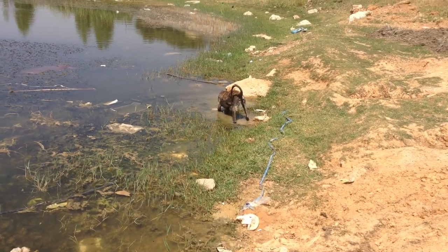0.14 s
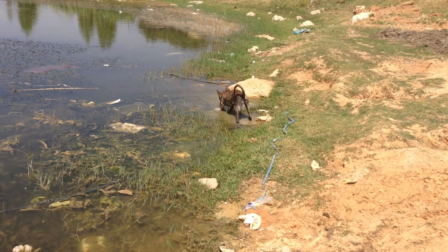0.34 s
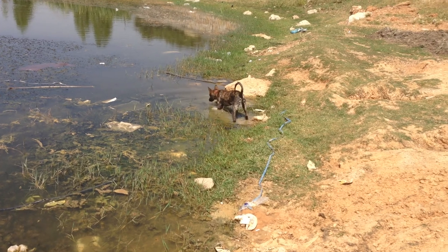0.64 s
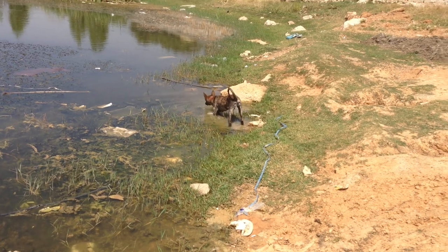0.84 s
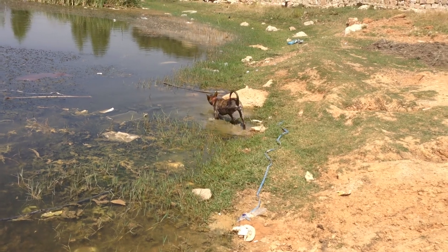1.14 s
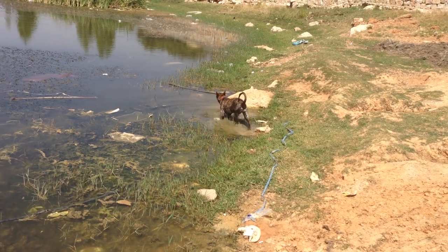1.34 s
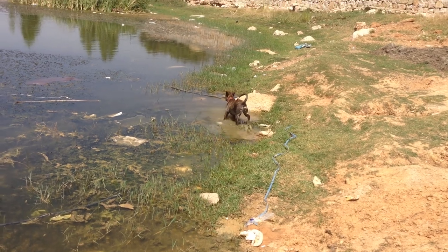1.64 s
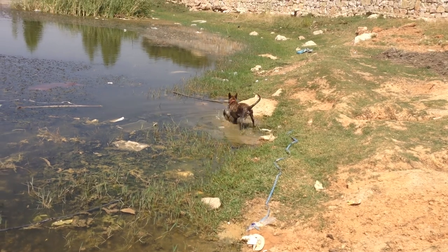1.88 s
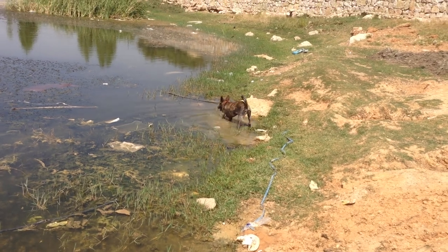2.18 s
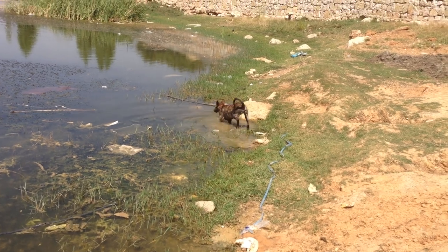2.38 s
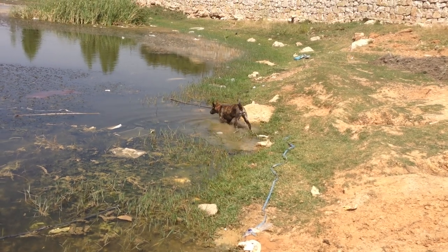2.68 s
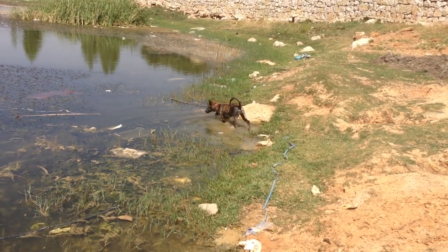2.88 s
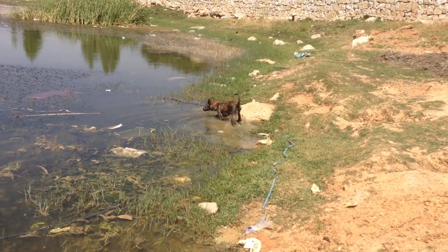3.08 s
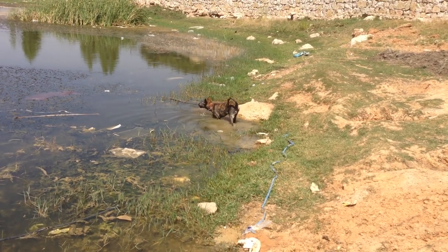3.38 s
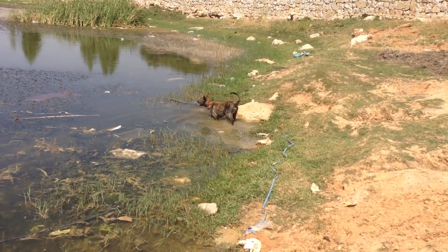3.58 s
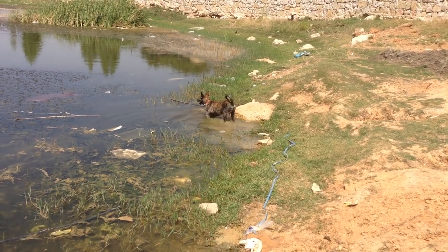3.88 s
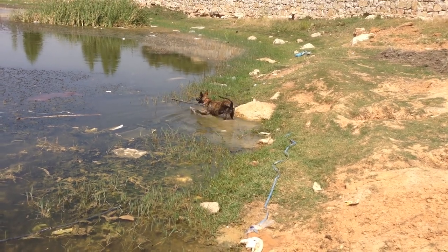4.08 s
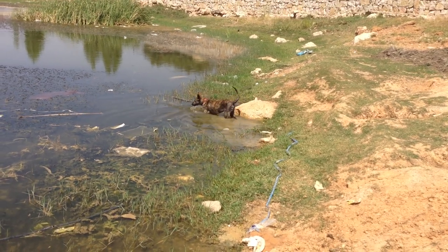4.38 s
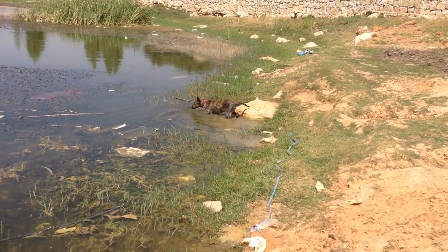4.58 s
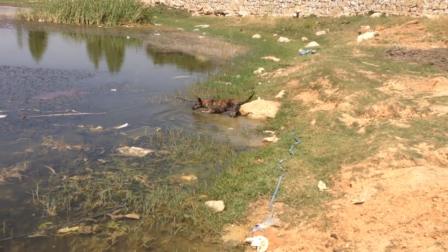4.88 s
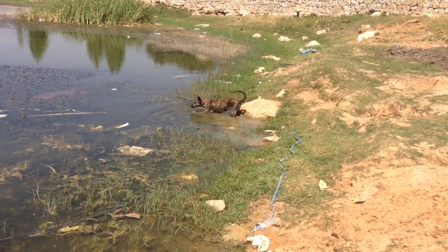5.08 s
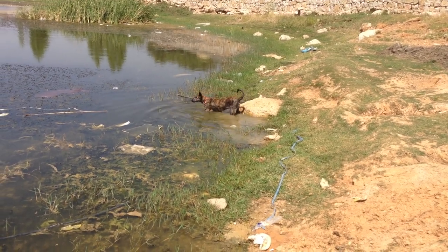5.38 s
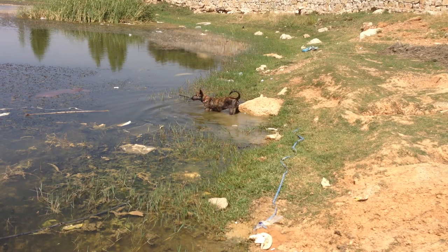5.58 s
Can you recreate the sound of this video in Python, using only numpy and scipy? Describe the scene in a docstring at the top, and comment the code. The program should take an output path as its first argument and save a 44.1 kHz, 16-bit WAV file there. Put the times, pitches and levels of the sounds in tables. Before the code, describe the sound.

A dog sloshes faintly through shallow pond water, with one sharp, loud snap near the microphone and a small bird chirping.

```python
"""A dog wades in the shallows of a pond some metres away: paws slap, plunge and spit spray, trapped air
rings as bubbles, and the legs push up sloshes and gurgles. A small bird repeats a twisting chirp.
Light wind bumps the microphone and two thin rustles pass over a quiet outdoor hush.
Right at the microphone something hard snaps once, bright and loud, like a handled casing."""
import sys
import numpy as np
from scipy import signal
from scipy.fft import rfft, irfft
from scipy.io import wavfile
from scipy.ndimage import uniform_filter1d

SR = 44100
rng = np.random.default_rng(int(sys.argv[2]) if len(sys.argv) > 2 else 0)


def log_audio(samples):
    """Write samples as a 16-bit WAV file to the path given in sys.argv[1]."""
    # one column per channel
    frames = np.atleast_2d(samples).T
    # limit to full scale, then quantise
    limited = np.clip(frames, -1, 1)
    pcm = np.round(limited * 32767).astype(np.int16)
    wavfile.write(sys.argv[1], SR, pcm)


N = 252693
TIME = np.arange(N) / SR

# Paws striking the water; closing_db is the water falling back, relative to the strike.
# start_s, slap_db, centre_hz, t60_s, closing_db, spray_db
PAW_FALLS = [(0.707, -50, 1684, 0.042, -12, -40), (0.863, -47, 1080, 0.024, -9, -49),
             (1.052, -53, 1130, 0.027, -19, -46), (1.31, -46.5, 2180, 0.012, -14, -53),
             (1.342, -40.5, 1470, 0.011, -10, -44.5), (1.461, -49, 1260, 0.02, 2.5, -56.5),
             (1.688, -51, 2230, 0.036, -5, -65), (1.828, -47, 1700, 0.0096, -11, -52),
             (2.048, -46.5, 3300, 0.019, 2.5, -51), (2.224, -42.5, 2280, 0.018, -11, -46),
             (2.446, -46, 1340, 0.015, -20, -70), (2.508, -51, 1020, 0.012, -20, -70),
             (2.6035, -39.5, 1870, 0.0072, -19.5, -56), (2.703, -39.5, 1005, 0.048, -19, -54.5),
             (3.014, -44, 3320, 0.029, -4.5, -50.5), (3.166, -47, 1650, 0.014, 1, -52),
             (3.296, -44.5, 2800, 0.032, -11, -56.5), (3.98, -55, 1730, 0.022, -18, -72),
             (4.156, -44, 1510, 0.0094, 6.5, -57.5), (4.341, -43, 1060, 0.014, -26, -54),
             (4.65, -49, 1480, 0.021, -20, -74), (4.695, -45, 1340, 0.035, -21, -74)]
CLOSING_S = 0.016  # the water falls back this long after a paw


def undb(db):
    """Decibels to gain."""
    return 10 ** (np.asarray(db) / 20)


def unit(x):
    """Scale to rms 1."""
    return x / np.sqrt(np.mean(x ** 2))


def add(out, start_s, sound):
    """Mix a sound in at its start time."""
    start = int(np.clip(start_s * SR, 0, N - 1))
    out[start:start + len(sound)] += sound[:N - start]


def colour(x, points, size=4096):
    """Minimum-phase EQ through (Hz, dB) points, so nothing rings ahead of an attack."""
    hz, db = np.transpose(points)
    bin_hz = np.fft.rfftfreq(size, 1 / SR) + 1
    log_gain = np.log(undb(np.interp(np.log(bin_hz), np.log(hz), db)))
    cepstrum = irfft(log_gain)[:size // 2]
    cepstrum[1:] *= 2
    impulse = irfft(np.exp(rfft(cepstrum, size)))
    return signal.fftconvolve(x, impulse)[:len(x)]


def band(x, low_hz, high_hz, order=2):
    """Band-pass."""
    sos = signal.butter(order, [low_hz, min(high_hz, SR / 2 - 1)], "band", fs=SR, output="sos")
    return signal.sosfilt(sos, x)


def walk(per_s):
    """A random modulator gliding between values with a spread of 1."""
    knots = np.arange(0, TIME[-1] + 1, 1 / per_s)
    return np.interp(TIME, knots, rng.standard_normal(N)[:len(knots)])


def fade(t60, size):
    """Exponential decay, 60 dB down after t60 seconds."""
    return np.exp(-np.log(1000) * TIME[:size] / max(t60, 1 / SR))


def swell(start_s, length_s, attack_s, release_s):
    """An envelope that rises, holds to the end of its length, then dies away."""
    t = TIME - start_s
    return np.clip(t / attack_s, 0, 1) * np.exp(-np.clip((t - length_s) / release_s, 0, 20))


def hush(level_db=-69.5):
    """A quiet, barely wavering bed of open air and microphone hiss."""
    # Tone of the bed: frequency_hz, gain_db
    spectrum = [(30, -46), (59, -24.5), (90, -13), (130, -3.5), (243, 1), (420, -3), (1150, -5.5),
                (1870, -8.5), (3400, -9.5), (6890, -13), (14300, -11.5), (15500, -11.5)]
    return undb(level_db + 0.29 * walk(11)) * unit(colour(rng.standard_normal(N), spectrum))


def wind(flutter_db=3, crackle_db=-15):
    """Small eddies bump briefly and unevenly against the microphone, with a faint crackle."""
    # Puffs of wind: start_s, length_s, level_db, centre_hz
    puffs = [(0.04, 0.53, -75.5, 122), (0.199, 0.023, -64.5, 200), (0.243, 0.0085, -57.5, 206),
             (0.358, 0.0063, -63, 172), (0.38, 0.0051, -57, 167), (4.949, 0.009, -58, 183),
             (4.974, 0.072, -64, 150), (5.041, 0.083, -59, 155), (5.122, 0.72, -79, 130.7),
             (5.265, 0.065, -71, 122.7), (5.459, 0.032, -68, 151), (5.511, 0.02, -61, 160)]
    eddies = rng.standard_normal(N) * undb(flutter_db * walk(120))
    crackle = unit(band(rng.standard_normal(N) * undb(6 * walk(200)), 200, 420))
    out = np.zeros(N)
    for start_s, length_s, db, hz in puffs:
        shape = swell(start_s, length_s, attack_s=0.0018, release_s=0.00722)
        rumble = unit(band(eddies, hz * 0.75, hz * 1.2))
        puff = shape * (rumble + undb(crackle_db) * crackle)
        out += undb(db) * puff * np.linalg.norm(shape) / np.linalg.norm(puff)
    return band(out, 75, 900)


def bird(upper_ratio=1.13, upper_db=-3, warble_hz=290):
    """A raspy, warbling chirp that swoops twice; the two sides of the syrinx sing slightly apart."""
    # Contour of one chirp: offset_s, pitch_hz, gain_db
    chirp = [(0, 3200, -14), (.010, 4000, -2), (.019, 4300, -1), (.033, 3500, 0), (.046, 2950, -6),
             (.059, 3150, 1), (.070, 3750, 0), (.084, 3000, 1), (.104, 2800, -2), (.122, 2500, -16)]
    # The bird's calls: start_s, level_db
    calls = [(0.218, -67), (2.78, -69.5), (3.833, -66), (4.696, -67.5)]
    out = np.zeros(N)
    offset_s, hz, db = np.transpose(chirp)
    t = TIME[:int(offset_s[-1] * SR)]
    for start_s, call_db in calls:
        for ratio, voice_db in ((1, 0), (upper_ratio, upper_db)):
            waver = .03 * walk(900)[:len(t)] + .025 * np.sin(2 * np.pi * warble_hz * t)
            pitch_hz = ratio * np.interp(t, offset_s, hz) * (1 + waver)
            rasp_db = 4.5 * walk(260)[:len(t)]
            level_db = call_db + voice_db + np.interp(t, offset_s, db) + rasp_db
            add(out, start_s, undb(level_db) * np.sin(2 * np.pi * np.cumsum(pitch_hz) / SR))
    return out


def rustle(attack_s=0.022, release_s=0.0074):
    """Thin, bright, uneven rustles pass."""
    # Swells of high hiss: start_s, length_s, level_db
    rustles = [(0.284, 0.025, -59.5), (1.08, 0.3, -75)]
    flutter_db = 3 * walk(45) + 3 * walk(400)
    envelope = sum(undb(db) * swell(start_s, length_s, attack_s, release_s)
                   for start_s, length_s, db in rustles)
    return envelope * undb(flutter_db) * unit(band(rng.standard_normal(N), 10400, 14400))


def bubble(hz, t60, octaves_per_s):
    """Trapped air rings and glides in pitch; a climb is a bubble nearing the surface."""
    t = TIME[:int(t60 * SR) + 2]
    phase = 2 * np.pi * np.cumsum(hz * 2 ** (octaves_per_s * t)) / SR
    attack = 1 - np.exp(-2 * hz * t)
    return np.sin(phase) * fade(t60, len(t)) * attack


def droplets(low_hz, high_hz, cycles, rise_octaves, count, spread_db=15):
    """A steady shower of small bubbles of mixed sizes, rms 1."""
    out = np.zeros(N)
    for when, pitch, life, loud in rng.random((count, 4)):
        hz = low_hz * (high_hz / low_hz) ** pitch
        t60 = cycles * (.5 + life) / hz
        add(out, when * N / SR, bubble(hz, t60, rise_octaves / t60) * undb(spread_db * loud ** 2))
    return unit(out)


def sloshing(lap_db=2.2, surge_db=1.3, spray_db=-18, fizz_db=-10):
    """Each push of a leg churns the water to a dense swish, sheds small bubbles and throws spray."""
    # Legs pushing through the water: start_s, length_s, level_db, centre_hz
    strokes = [(0.441, 0.09, -72, 1390), (0.614, 0.068, -72, 1800), (1.016, 0.24, -72.5, 1690),
               (1.293, 0.079, -71, 2190), (1.425, 0.058, -64.5, 1100), (1.715, 0.25, -64.5, 2130),
               (1.995, 0.26, -73, 2360), (2.423, 0.33, -66, 1560), (2.75, 0.45, -66.5, 2120),
               (3.232, 0.3, -73.5, 2120), (3.921, 0.29, -68.5, 1700), (4.298, 0.015, -63.5, 1090),
               (4.41, 0.15, -75.5, 826), (4.644, 0.39, -72.5, 1600)]
    burble = undb(-4.5) * droplets(700, 2600, cycles=12, rise_octaves=.3, count=1800)
    churn = droplets(350, 8000, cycles=5, rise_octaves=.1, count=9000)
    lapping = undb(lap_db * walk(46) + surge_db * walk(27))  # quick gulps on slower surges
    water = band(churn + burble, 400, 6500) * lapping
    spray = unit(band(churn, 3000, 16370, order=1))
    out, effort = np.zeros(N), np.zeros(N)
    for start_s, length_s, db, hz in strokes:
        shape = swell(start_s, length_s, attack_s=0.0262, release_s=0.069)
        active = shape > 1e-3
        swish = unit(band(water[active], hz * 0.8, hz * 2.78, order=1))
        out[active] += undb(db) * shape[active] * swish
        effort += undb(db) * shape
    # foam fizzes on between pushes that follow each other closely
    foam = uniform_filter1d(effort, size=11000)
    fizz = unit(band(rng.standard_normal(N) * undb(3.77 * walk(250)), 2300, 5440))
    return out + undb(spray_db) * effort * spray + undb(fizz_db) * foam * fizz


def gurgles(bubbles_per_s=330, spread_octaves=.33, cycles=19, rise_octaves=0.17, scatter_db=1.5):
    """A moving leg folds air under, and it breaks into a quick run of bubbles of similar size."""
    # Bubble clusters: start_s, length_s, level_db, pitch_hz
    clusters = [(0.51, 0.036, -65.5, 1190), (1.055, .05, -67, 1110), (1.116, .035, -66.5, 1400),
                (1.201, .04, -67, 1730), (1.453, 0.026, -58.5, 663), (1.738, 0.021, -64.5, 1810),
                (1.831, 0.022, -60.5, 1650), (1.9, 0.077, -64.5, 1500), (2.449, 0.038, -65, 1140),
                (2.986, 0.053, -66, 1700), (3.683, 0.066, -68, 920), (3.81, 0.01234, -56.5, 740),
                (3.887, 0.04, -58.5, 1013), (3.936, 0.036, -67, 784), (4.017, 0.078, -64, 845),
                (4.67, 0.037, -60, 1860), (4.738, 0.023, -62, 1540), (4.876, 0.073, -63.5, 1155),
                (5.07, .04, -63, 1110)]
    out = np.zeros(N)
    for start_s, length_s, db, hz in clusters:
        cluster = np.zeros(N)
        count = int(length_s * bubbles_per_s) + 1
        for k, (late, pitch, loud) in enumerate(rng.standard_normal((64, 3))[:count]):
            bubble_hz = hz * 2 ** (spread_octaves * pitch)
            t60 = cycles / bubble_hz
            blip = undb(scatter_db * loud) * bubble(bubble_hz, t60, rise_octaves / t60)
            add(cluster, start_s + (k + late / 2) * length_s / count, blip)
        out += undb(db) * cluster * np.sqrt(length_s * SR / np.sum(cluster ** 2))
    return out


def snap(rebound_s=0.00048, rebound_db=-8, knock_s=0.59, knock_db=-32, scrape_s=0.587):
    """A hard edge slips in quick jerks, each ringing the casing very briefly, then scrapes to rest."""
    # Resonance of the casing: frequency_hz, gain_db
    casing = [(410, -53), (700, -28.5), (1050, -46.5), (2370, -34), (2730, -31.5), (6340, -21.5),
              (9720, -9.5), (11800, 0.5), (13600, 3.5), (15500, -15)]
    # Slips of the edge: start_s, peak_db
    jerks = [(0.5842, -4), (0.5870, -5), (0.5898, -3), (0.5913, -4), (0.5932, -6), (0.6262, -19)]
    out = np.zeros(N)
    for start_s, db in jerks:
        for bounce in range(3):  # every jerk chatters on, weaker each time
            push = .1 * rng.standard_normal(1024) * fade(.003, size=1024)
            push[0] = 1
            slip = colour(push, casing)
            late_s = bounce * rebound_s * rng.uniform(.7, 1.3)
            add(out, start_s + late_s, undb(db + bounce * rebound_db) * slip / np.abs(slip).max())
    # the heaviest jerk also knocks the body
    knock = band(fade(t60=0.0017, size=4096), 114.6, 12000, order=1)
    add(out, knock_s, undb(knock_db) * knock)
    grit = rng.standard_normal(N) * undb(1.4 * walk(1300))
    scrape_db = -24 - 316 * np.maximum(TIME - scrape_s, 0)  # falls 316 dB a second
    shape = swell(scrape_s, length_s=.046, attack_s=0.0045, release_s=0.0045)
    return out + undb(scrape_db) * shape * unit(colour(grit, casing))


def paws(entry_s=0.014, entry_db=-13, wetting_s=0.0013, hollow_db=-7, ring_t60_at_1khz=0.038):
    """Each paw slaps open a briefly ringing hollow and the water closes over it; trapped air rings."""
    # Air pockets and drips: start_s, pitch_hz, level_db, glide_octaves_per_s
    pockets = [(0.87, 162, -50.5, 2), (0.933, 433, -54, 17.5), (0.947, 543, -58, 15),
               (1.457, 421, -47.5, 18.5), (1.762, 1540, -50, 1), (2.182, 890, -52, 16),
               (2.197, 1130, -52, 8), (2.225, 252.4, -43, -5), (2.508, 619.5, -54, 4),
               (2.6025, 2780, -39.5, 8), (2.605, 1030, -44.5, 11), (2.625, 880, -47, 8),
               (2.704, 335, -55, 15), (2.787, 1000, -49, 17), (3.085, 1110, -50, 0), (3.185, 268, -55, 5),
               (3.298, 226, -46, -11), (3.442, 1146, -49.5, 36), (3.797, 352, -47, 32),
               (3.877, 934, -49, 12), (3.908, 806, -48, 7), (4.158, 1445, -40, -26), (4.172, 427, -58, 0),
               (4.345, 225.6, -44, -4), (4.483, 843, -54.5, 13), (4.762, 1686, -49, 15),
               (4.966, 399, -50.5, 2), (5.086, 980, -50.5, 22)]
    out = np.zeros(N)
    lead = 2048  # samples in which the paw shoves water ahead of it before it strikes
    entry = undb(entry_db) * np.exp(-TIME[:lead] / entry_s)[::-1]
    attack = (1 - np.exp(-TIME[:4096] / wetting_s)) ** 2
    for start_s, db, hz, t60, closing_db, _ in PAW_FALLS:
        burst = fade(t60, size=4096) * attack
        shape = np.concatenate([entry, burst / burst.max()])
        for hit_s, hit_db in ((start_s, db), (start_s + CLOSING_S, db + closing_db)):
            splash = band(rng.standard_normal(len(shape)) * shape, hz * 0.34, hz * 1.6, order=1)
            slap = band(splash, 197, hz * 3.16)
            add(out, hit_s - (lead / SR + wetting_s / 2), undb(hit_db) * slap / np.abs(slap).max())
            hollow = bubble(hz * rng.uniform(.9, 1.1), t60, octaves_per_s=12)
            add(out, hit_s, undb(hit_db + hollow_db) * hollow)
    for start_s, hz, db, glide in pockets:
        t60 = ring_t60_at_1khz * (1000 / hz) ** 0.49  # bigger, deeper bubbles ring longer
        add(out, start_s, undb(db) * bubble(hz, t60, glide))
    # so small a source radiates almost no deep bass
    return band(out, 215, 5500)


def spray_ticks(t60=0.025, attack_s=.002):
    """Faint, ragged spits of spray as the paws strike and the water closes."""
    out = np.zeros(N)
    shape = fade(t60, size=4096) * (1 - np.exp(-TIME[:4096] / attack_s))
    for start_s, _, _, _, closing_db, db in PAW_FALLS:
        for hit_s, peak_db in ((start_s, db), (start_s + CLOSING_S, db + closing_db)):
            grit = rng.standard_normal(len(shape)) * undb(3 * np.repeat(rng.standard_normal(64), 64))
            tick = band(grit * shape, 9100, 19760)
            add(out, hit_s, undb(peak_db) * tick / np.abs(tick).max())
    return out


def banks(x, t60, wet_db):
    """The pond's banks scatter back a short, dull tail."""
    tail = band(rng.standard_normal(16384) * fade(t60, size=16384), 245.6, 7500, order=1)
    return x + undb(wet_db) * signal.fftconvolve(x, tail / np.linalg.norm(tail))[:N]


def scene():
    """Mono mix: the pond at a distance, the bird farther off; snap, spray, rustle, wind and hush dry."""
    water = banks(sloshing() + gurgles() + paws(), t60=0.051, wet_db=-14)
    far_bird = banks(bird(), t60=0.096, wet_db=-5)
    return (water + far_bird + snap() + spray_ticks() + rustle() + wind() + hush())[None]


def record(dry, top_hz=15400):
    """A steep low-pass trims the highest treble."""
    return signal.sosfilt(signal.ellip(10, .2, 75, top_hz, fs=SR, output="sos"), dry)


dry = scene()
out = record(dry)
log_audio(out)
```